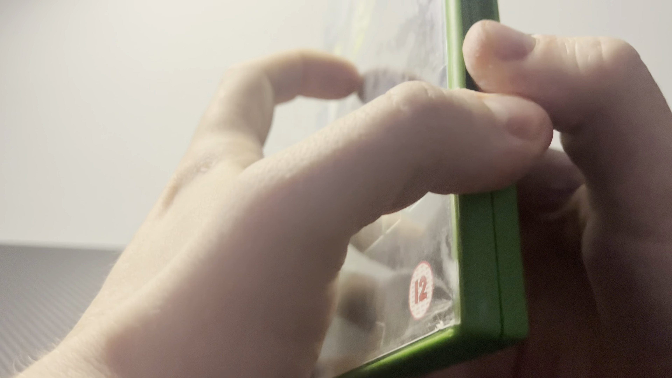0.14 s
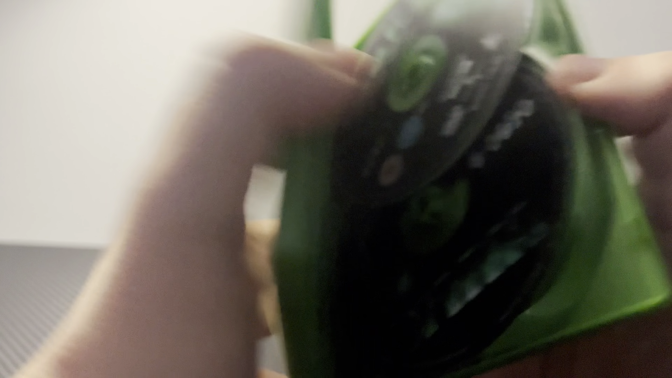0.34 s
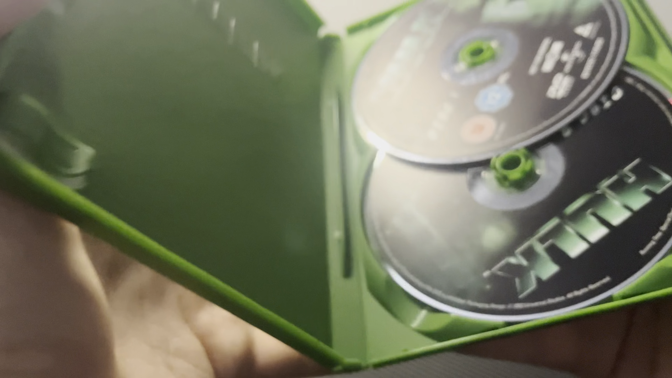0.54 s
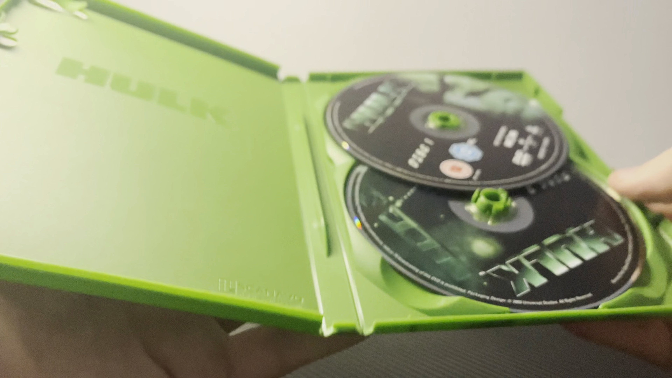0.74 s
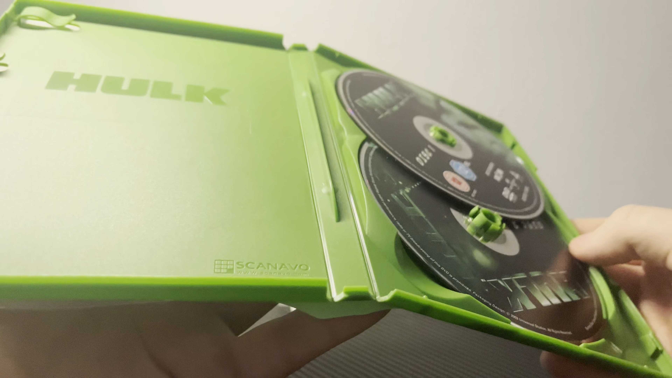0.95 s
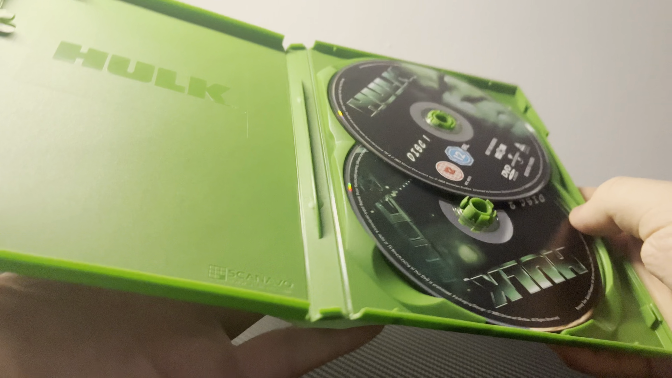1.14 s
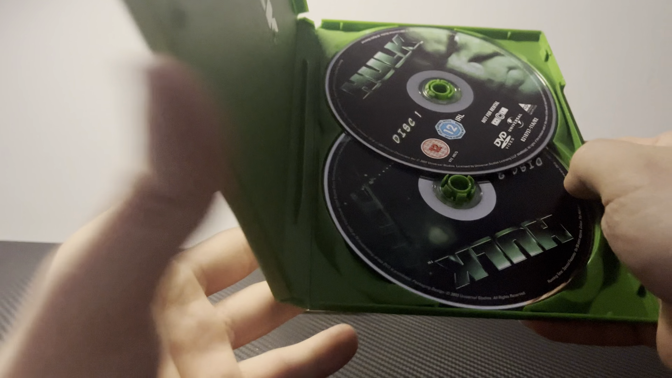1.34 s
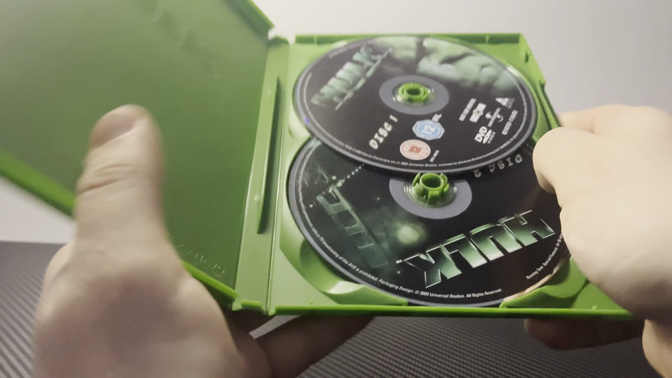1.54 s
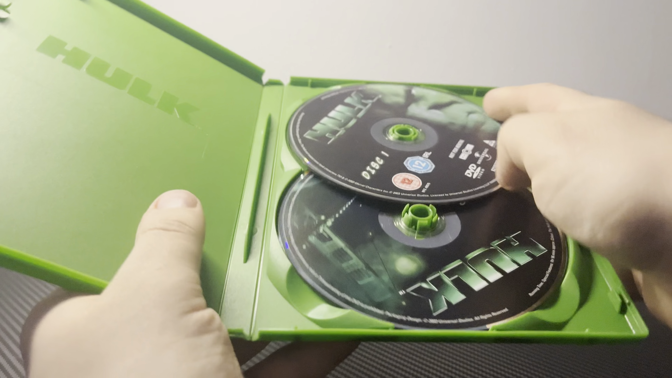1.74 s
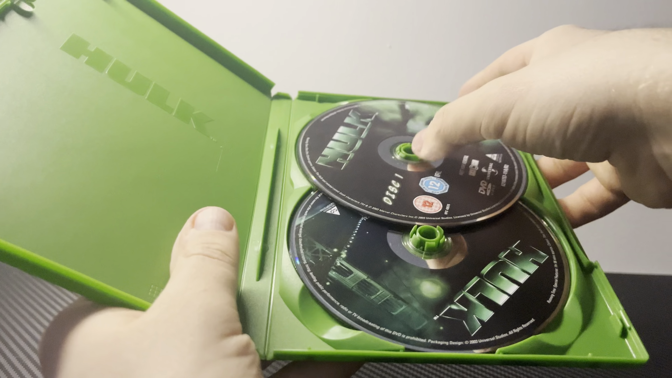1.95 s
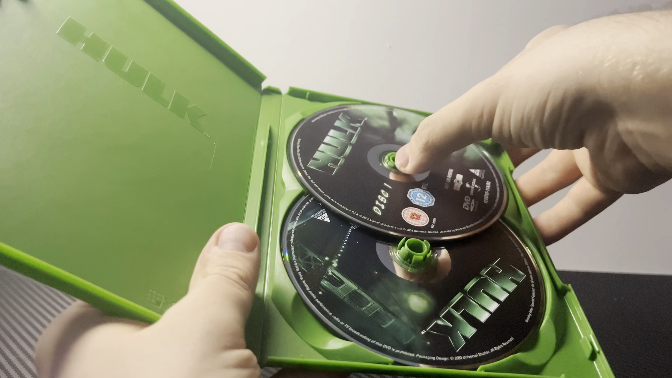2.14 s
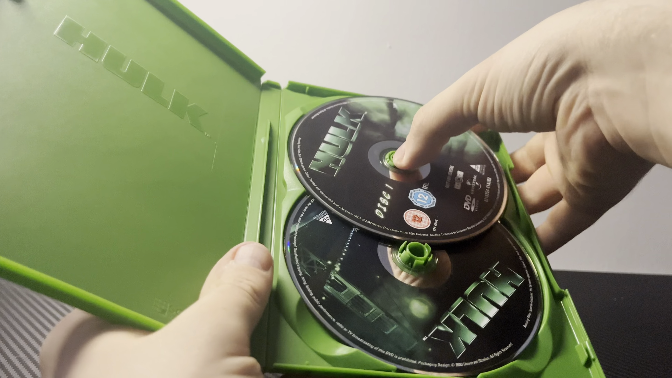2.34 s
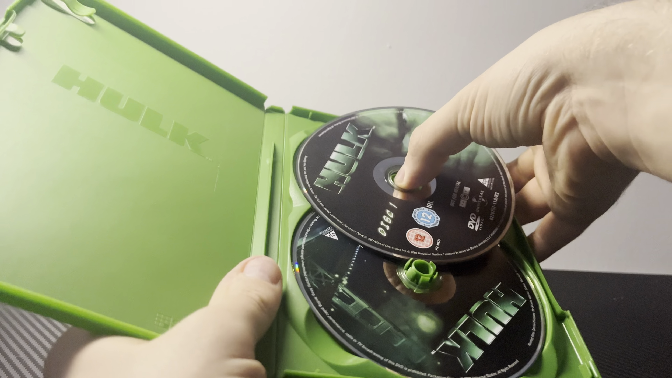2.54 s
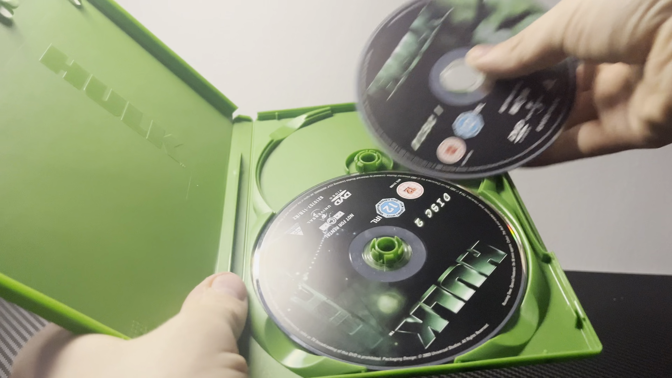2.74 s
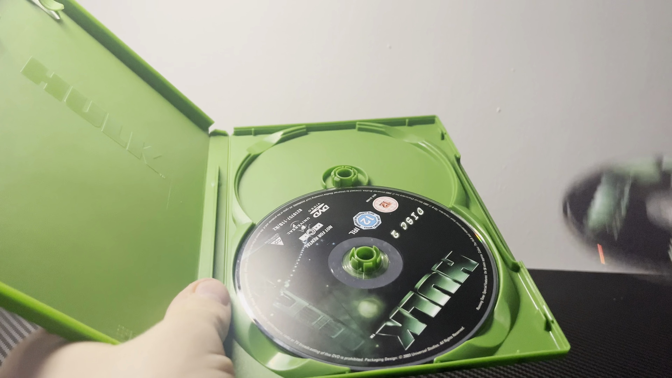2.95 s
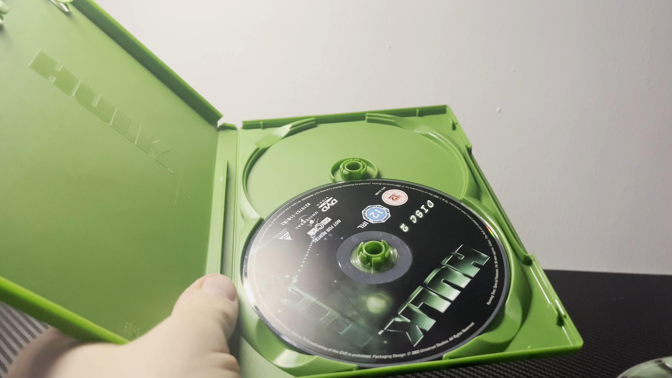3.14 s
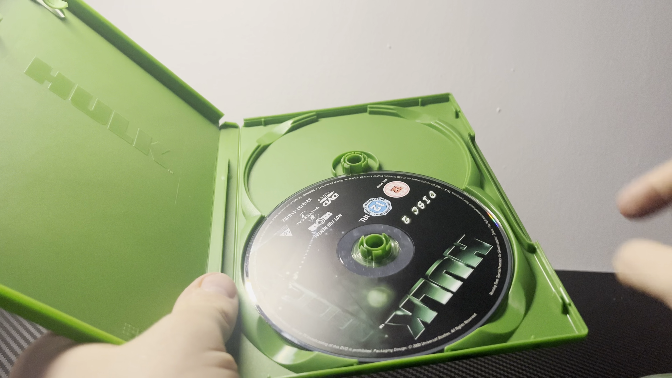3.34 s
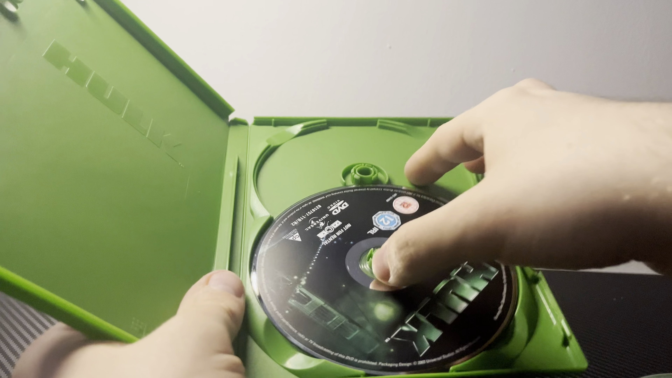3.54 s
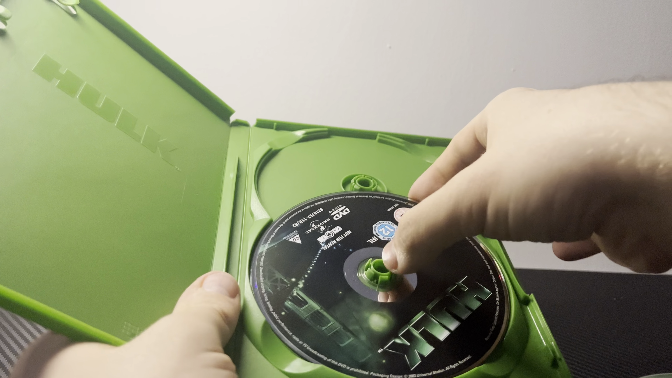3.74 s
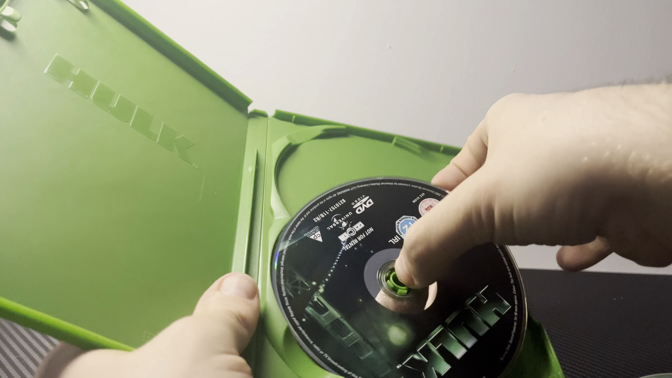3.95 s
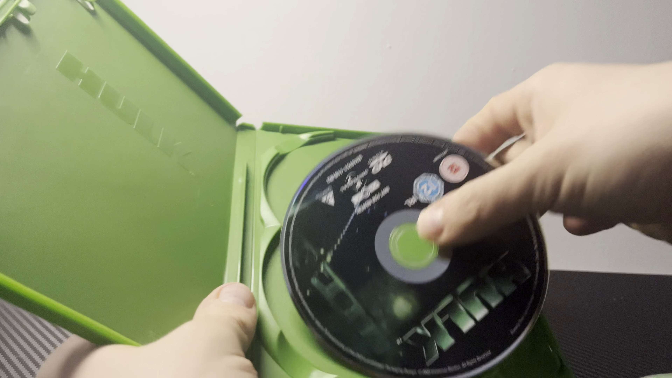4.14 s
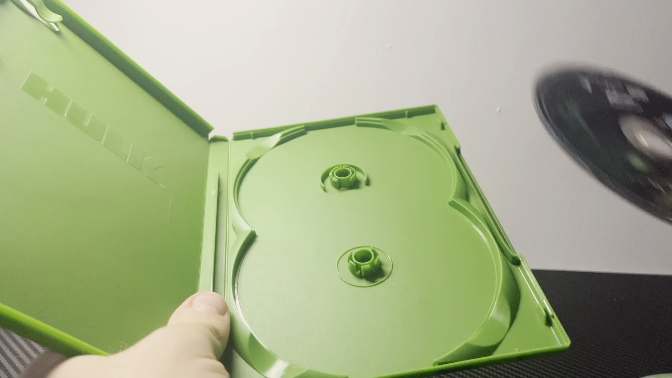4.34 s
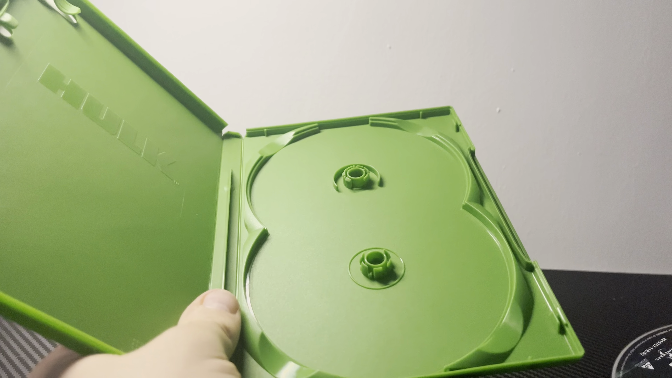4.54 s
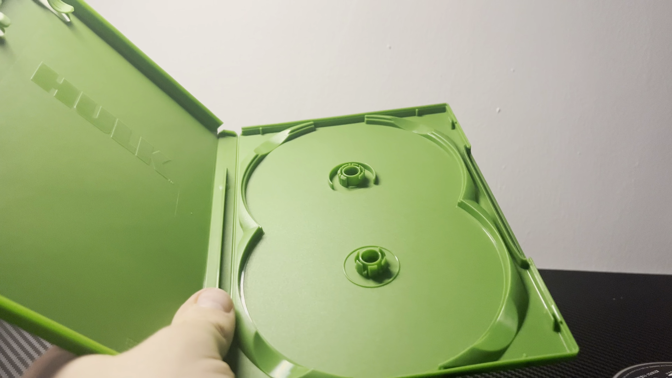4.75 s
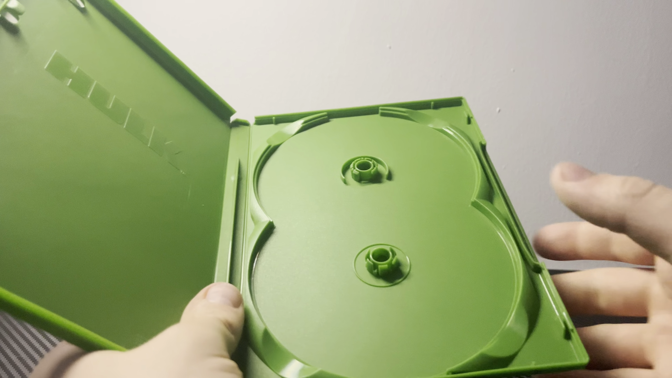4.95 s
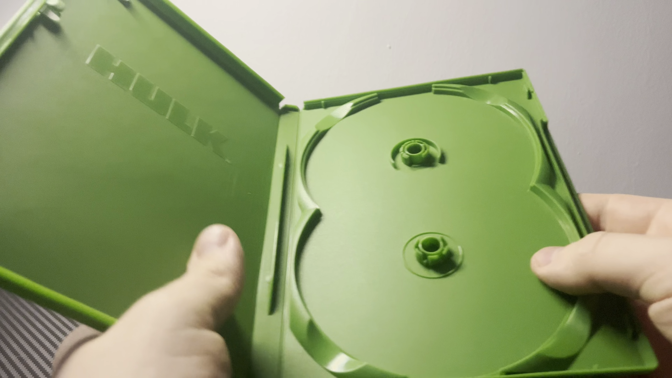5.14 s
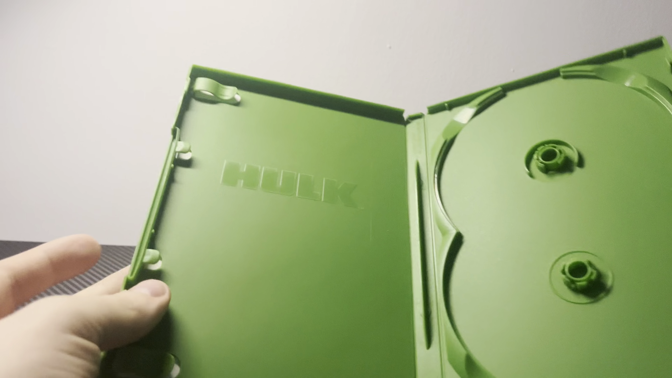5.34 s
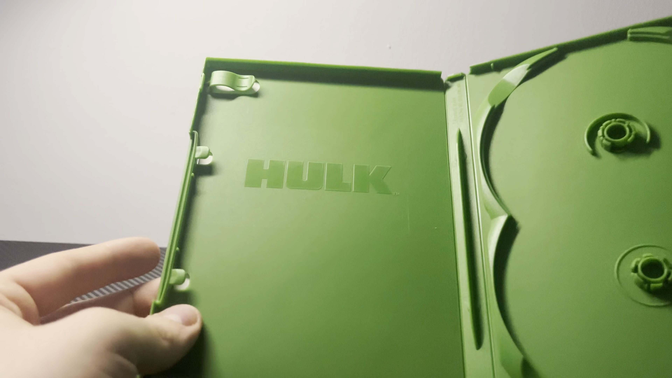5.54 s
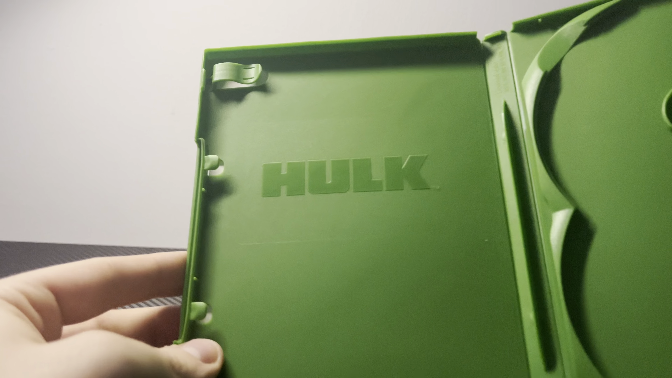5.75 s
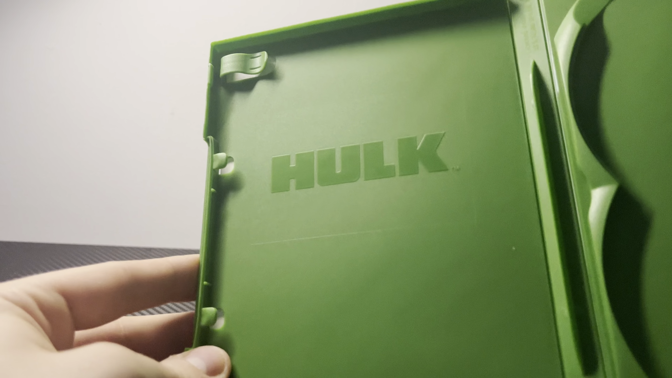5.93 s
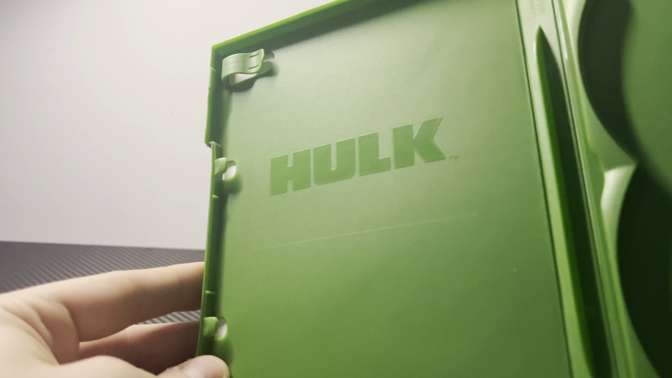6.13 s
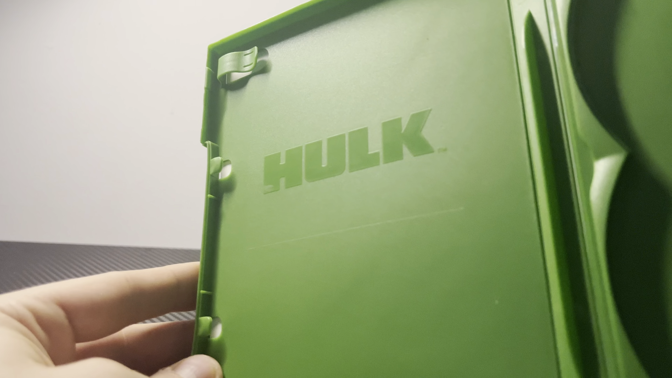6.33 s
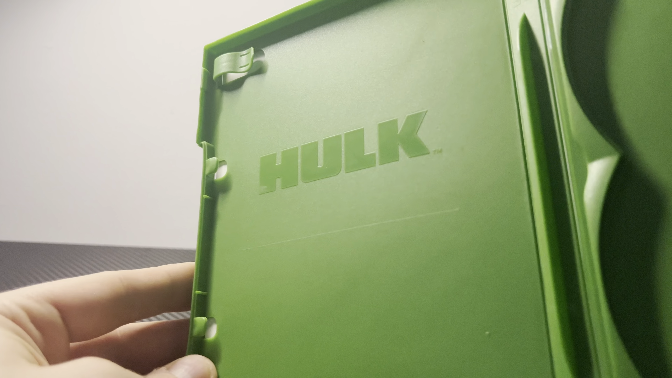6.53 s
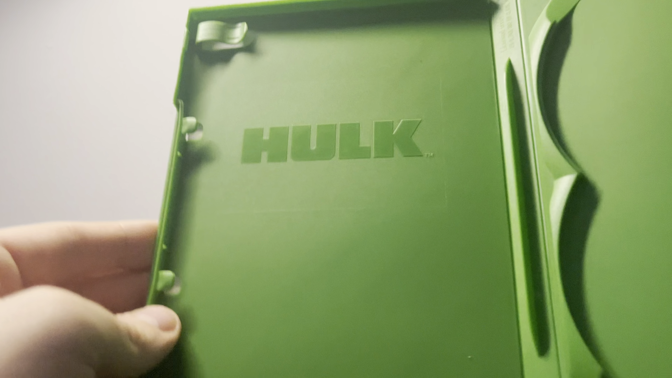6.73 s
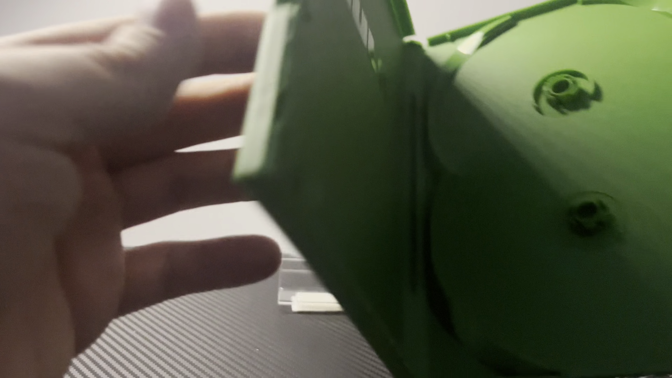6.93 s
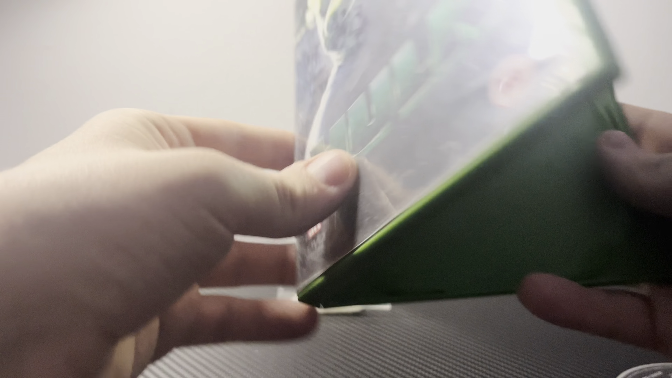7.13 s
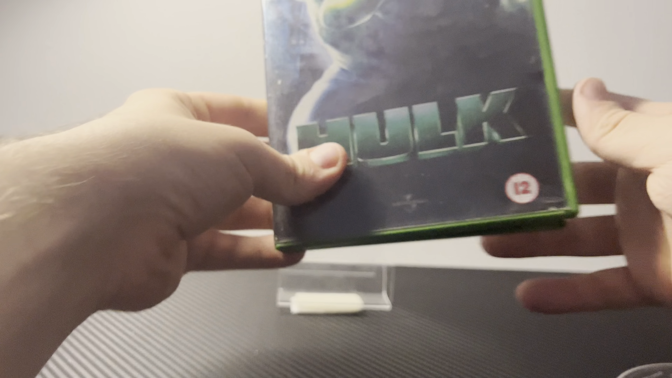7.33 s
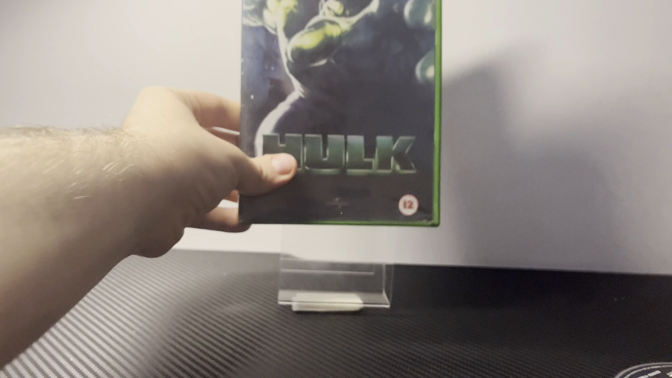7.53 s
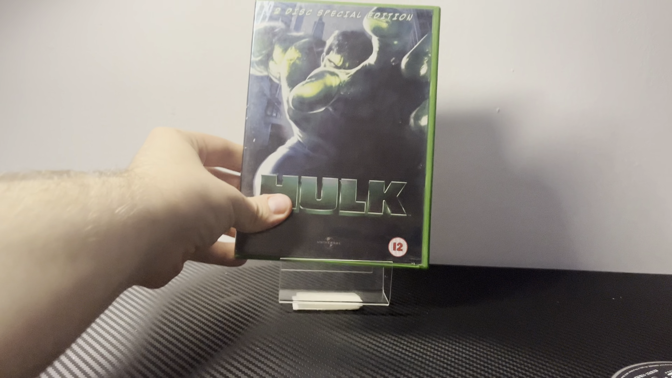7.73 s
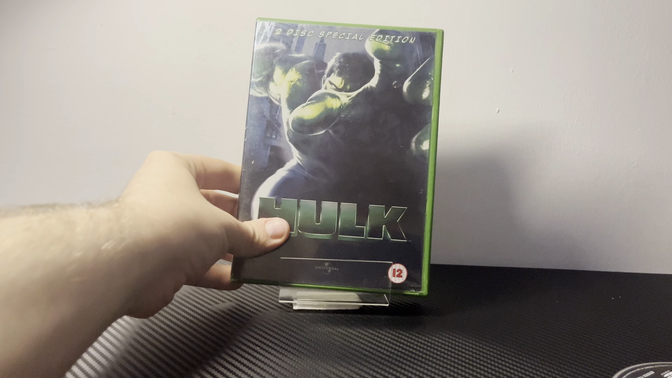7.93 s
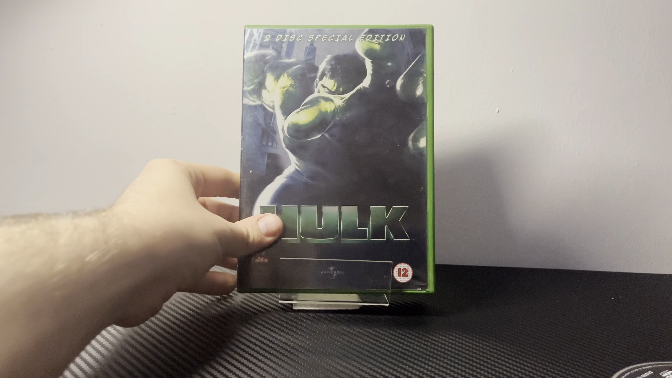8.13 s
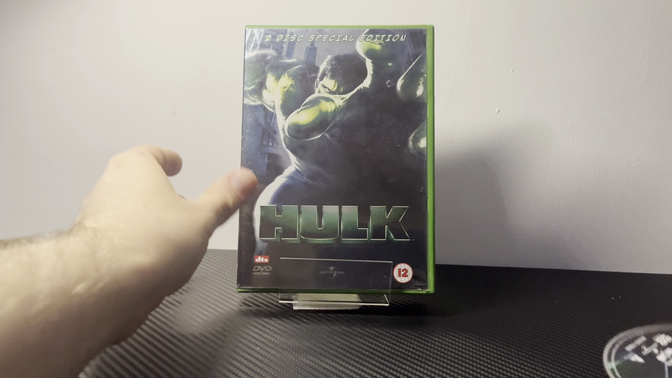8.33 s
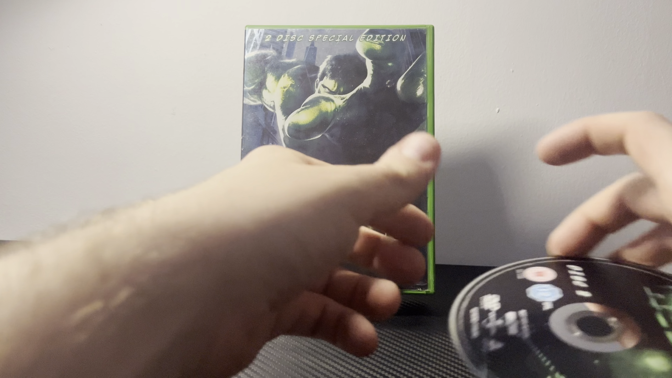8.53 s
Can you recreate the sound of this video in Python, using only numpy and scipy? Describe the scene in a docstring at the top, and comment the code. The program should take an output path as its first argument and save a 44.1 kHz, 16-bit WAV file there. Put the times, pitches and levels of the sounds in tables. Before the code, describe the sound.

A close, dry phone pickup in a small quiet room, with faint air, low hum and wavering hand rumble. Light ticks at 0.2-0.3 seconds lead to a loud hollow plastic double snap with a low thump near 0.35, then a click at 0.42 and loose rattles until about 1.0. Soft scuffs and small dull clicks continue from 1.2 to 2.2. At 2.48 a very sharp crack, followed by another at 2.6, pops the first disc loose; it scrapes brightly to 2.8, with a small tap at 3.1. A second pair of hard pops comes at 3.9-3.95, with a ringing scrape around 4.15. Light table taps fall at 4.5-4.7. Faint rubbing and near-quiet follow through 7.3, including a very soft closing. A dull knock at 7.57 and gentle rocking contacts at 7.9-8.1 set the case on its stand, then quiet.

```python
"""A plastic disc case handled close to a phone in a quiet small room, over a low rumble and hum: it is
snapped open, two discs are popped off their hubs and laid on a table, the case is turned, shut and
stood on a small acrylic stand. Soft thumps are short damped swings of hands, lid and table; blows are
chattering noise bursts through plastic resonances; a fading rustle of loose parts shivers after those
on the case; fingers and sleeve scuff in strokes of noisy slips through the same resonances."""
import sys
import numpy as np
from scipy import signal
from scipy.fft import rfft, irfft, next_fast_len
from scipy.io import wavfile
from scipy.ndimage import uniform_filter1d

SR = 44100
rng = np.random.default_rng(int(sys.argv[2]) if len(sys.argv) > 2 else 0)


def level_to_linear(level):
    """Convert decibel levels to linear amplitude factors, elementwise."""
    exponent = np.asarray(level, float) / 20
    return 10 ** exponent


def output_pcm(signal):
    """Save a mono or channel-first signal as 16-bit PCM at the path in sys.argv[1].

    Samples are clipped to [-1, 1] before scaling.
    """
    pcm = np.clip(np.atleast_2d(signal).T, -1, 1) * 32767
    wavfile.write(sys.argv[1], SR, np.round(pcm).astype(np.int16))


N = 378378

# blows: t/s, crack level/dB, shell level/dB, top octave lift/dB
BLOWS = [(0.1678, -24.5, -42, 10), (0.2623, -40, -51, 5.5), (0.3001, -34, -55, 4), (0.3366, -12, -9.5, 2.5),
         (0.3453, -9.5, -8.5, -6.5), (0.4211, -17, -29, -4), (0.5217, -28.5, -49.5, 3.5),
         (0.5439, -28, -43.5, -2), (0.6002, -26, -56.5, 0.5), (0.659, -25, -54, 4.5),
         (0.6914, -19, -56.5, -1), (0.7675, -27.5, -79, 4), (0.9609, -27, -55.5, -0.5),
         (0.987, -29.5, -46.5, 4.5), (1.1911, -32.5, -45, -22), (1.2507, -38, -42, -8.5),
         (1.4696, -39.5, -48, -7), (1.5061, -36, -43, -13.5), (1.5806, -38, -51, -10),
         (1.6662, -33, -43.5, -7), (1.764, -32.5, -36, -7.5), (1.8902, -38.5, -39, 1.5),
         (1.9997, -31, -40, 1.5), (1.9114, -23, -34.5, -13.5), (2.0265, -23, -33, -5),
         (2.0764, -28.5, -39.5, -11), (2.1679, -34, -45.5, -7), (2.423, -34.5, -54, 11.5),
         (2.4777, 0, -19.5, -4.5), (2.596, -6.5, -16, -1), (2.761, -23, -33.5, -3.5),
         (2.77, -21.5, -36, -5.5), (3.0894, -28, -37.5, -2.5), (3.8919, -46, -32.5, -6.5),
         (3.912, -10, -28, -4.5), (3.9526, -5.5, -16, 1), (4.118, -32.5, -30, -14),
         (4.1378, -22.5, -36, -5.5), (4.5317, -27.5, -38.5, 5), (4.6531, -40, -42, 8.5),
         (4.688, -31.5, -39.5, 11.5), (5.0245, -52, -63, 6), (5.0894, -39, -47.5, 4),
         (5.344, -40.5, -41.5, 7.5), (6.8369, -31, -77, 1), (7.0328, -63, -46.5, 18),
         (7.2867, -37.5, -49.5, 2), (7.5736, -19.5, -26.5, -11.5), (7.867, -32.5, -36, -9),
         (7.993, -44, -27.5, 0), (8.096, -68, -30.5, -4.5), (8.2085, -53.5, -65.5, 8),
         (8.543, -48.5, -52.5, -16.5)]
# resonances of the case: f/Hz, width/Hz, level/dB
CASE = [(265, 240, 0.5), (694, 110, -1), (948, 160, -6.5), (1450, 150, -2.5), (2270, 54, 4),
        (3420, 390, -4.5), (4050, 780, -3.5), (5200, 900, -7)]
# resonances of the stand: f/Hz, width/Hz, level/dB
STAND = [(278, 98, -7), (806, 250, -6.5), (1010, 51, 0), (1638.6, 89, -4.5), (2700, 110, -9),
         (4660, 300, -7.5)]
# broad spectrum of cracking and scuffed plastic: f/Hz, relative level per Hz/dB
PLASTIC = [(600, -26), (1200, -12.5), (2400, -4.5), (6000, -8), (7900, -18), (11300, -9), (14000, -17.5),
           (16300, -48.5)]
# a freed disc scrapes over rim and hub: start t/s, end t/s
DISC_SLIDES = [(2.66, 2.8), (4.14, 4.3)]
STAND_FROM_S = 7.5
SPLIT_HZ = 1300.0  # dull shell modes below, treble above


def level(x, db=0):
    """Scale to an rms level."""
    return x * level_to_linear(db) / np.sqrt(np.mean(x ** 2))


def on_log(table, hz, axis=1):
    """Read a column of a table on a log-frequency axis."""
    table = np.transpose(table)
    return np.interp(np.log(hz + 1), np.log(table[0]), table[axis])


def shaped(x, response):
    """Filter by a function of frequency."""
    size = next_fast_len(x.shape[-1])
    spectrum = rfft(x, size) * response(np.fft.rfftfreq(size, 1 / SR))
    return irfft(spectrum, size)[..., :x.shape[-1]]


def colour(table):
    """Gain curve of a short spectrum."""
    return lambda hz: level_to_linear(on_log(table, hz))


def ringing(modes, strength=1):
    """Response of damped resonances, each struck with its own signed strength."""
    f, width, db = np.transpose(modes)[:, :, None]
    gain = level_to_linear(db) * np.reshape(strength, (-1, 1))
    return lambda hz: np.sum(gain * 1j * hz * width / (f ** 2 - hz ** 2 + 1j * hz * width), axis=0)


def treble(x):
    """The part above the shell's dull modes."""
    return shaped(x, lambda hz: 1 / (1 + (SPLIT_HZ / (hz + 1)) ** 4))


def walk(rate_hz):
    """Random levels held 1 / rate_hz and slewed; spread near 1."""
    k = int(SR / rate_hz)
    held = np.repeat(rng.standard_normal(N // k + 1), k)
    return 1.3 * uniform_filter1d(uniform_filter1d(held, k), k)[:N]


def place(out, s, x):
    """Add x to out from time s."""
    i = int(s * SR)
    return np.pad(x, ((0, 0), (i, max(N - i - x.shape[1], 0))))[:, :N] + out


def background():
    """Still air, alike at both ports in the bass, a wavering hum and the rumble of moving hands."""
    # colour of air and rumble: f/Hz, relative level per Hz/dB
    quiet = [(30, -16), (55, -4.5), (110, -8.5), (300, -27), (700, -41.5), (5000, -43), (8000, -51.5),
             (15500, -56.5)]
    # hum: f/Hz, width/Hz, level/dB
    hums = [(102, 2.3, -70)]
    # handling rumble before its random waver: t/s, level/dB
    rumble_levels = [(0, -64.5), (1.001, -67.5), (2.001, -51), (2.299, -68), (5.501, -61.5), (6.302, -83.5),
                     (7.2, -68), (8, -55.5), (8.3, -87)]
    mid, side, hands = shaped(rng.standard_normal((3, N)), colour(quiet))
    side = shaped(side, lambda hz: np.minimum(hz / 500.0, 1))
    air = level(mid + side * np.array([[1], [-1]]), -65)
    hum = sum(level(shaped(rng.standard_normal(N), ringing([(f, w, 0)])), db) for f, w, db in hums)
    rumble = level(shaped(hands, lambda hz: 1 / (1 + (hz / 1000.0) ** 4)))
    rumble_db = np.interp(np.arange(N) / SR, *np.transpose(rumble_levels)) + 3.7 * walk(5.8)
    return air + hum + rumble * level_to_linear(rumble_db)


def thumps():
    """A soft contact, push or knock sets hands, lid or table swinging for a few damped cycles."""
    # thumps: t/s, peak level/dB, swing f/Hz
    pushes = [(0.015, -47.5, 580), (0.122, -57, 650), (0.221, -44.5, 680), (0.553, -40, 243),
              (0.579, -39, 235), (4.646, -42, 900), (0.355, -14.5, 120), (0.366, -21, 51.6),
              (2.031, -42, 100), (2.605, -28, 216), (2.771, -41, 109), (3.111, -41, 112.1),
              (3.287, -39, 113.9), (3.967, -20.5, 101), (4.555, -41, 106), (4.708, -26.5, 108),
              (5.116, -36.5, 62.3), (5.367, -38.5, 64), (7.117, -39, 92), (7.606, -37.5, 93),
              (7.915, -40, 100), (8.128, -34, 102.3)]
    out, t = 0, np.arange(SR // 4) / SR
    for s, db, hz in pushes:
        cycles = hz * t
        swing = np.sin(2 * np.pi * cycles) * (1 - np.exp(-cycles / 0.28)) * np.exp(-cycles / 1.1)
        out = place(out, s - 1 / hz, level_to_linear(db) * swing[None] / np.abs(swing).max())
    return out


def room(x):
    """A short diffuse tail, different at each port, each band of noise fading at its own rate."""
    # reverberation: f/Hz, t60/s, level/dB
    decay = [(149.55, 0.17, -14), (701.4, 0.032, 1.5), (4020, 0.098, -8.5), (13000, 0.013, -18.5)]
    t, tail = np.arange(SR // 2) / SR, 0
    for hz in 100 * 2 ** np.arange(0, 7.6, .75):
        noise = rng.standard_normal((2, len(t)))
        band = shaped(noise, lambda f: np.exp(-(np.log((f + 1) / hz) / 2.8) ** 2))
        band = band * level_to_linear(-60 * t / on_log(decay, hz)) * np.minimum(t / 0.046, 1)
        share = np.sqrt(hz / SR / np.sum(band ** 2, axis=1, keepdims=True))  # flat per Hz
        tail = tail + band * share * level_to_linear(on_log(decay, hz, axis=2))
    return signal.fftconvolve(x.mean(axis=0, keepdims=True), tail, axes=1)[:, :N]


def disc_on_case():
    """A freed disc's modes over the dull modes of the case."""
    # resonances of a disc: f/Hz, width/Hz, level/dB
    disc = [(1750, 120, -10), (2685, 97, -2), (3200, 84, -4), (3990, 86, -3)]
    return [mode for mode in CASE if mode[0] < SPLIT_HZ] + disc


def struck(s):
    """Modes of what is hit at time s: the case, a freed disc on the case, or the stand."""
    if any(start < s < end for start, end in DISC_SLIDES):
        return disc_on_case()
    return CASE if s < STAND_FROM_S else STAND


def blows():
    """Each contact chatters for a few ms: a broad crack and the modes of what is struck."""
    out, t = 0, np.arange(SR // 8) / SR
    for s, crack_db, shell_db, lift_db in BLOWS:
        # dull contacts on the stand roll in slowly
        rocking = level_to_linear(1.49 * np.clip(shell_db - crack_db, 0, 14)) if s > STAND_FROM_S else 1
        attack = np.minimum(t / (0.00037 * rocking), 1) ** 2
        noise, flurry = rng.standard_normal((2, len(t)))
        chatter = noise * level_to_linear(1.9 * flurry) * np.exp(-t / 0.0047) * attack
        modes = np.array(struck(s), float)
        modes[:, 0] *= 1 + .02 * rng.standard_normal(len(modes))  # the grip bends the pitches a little
        # a new spot, a new mix of modes
        sign, spread = rng.standard_normal((2, len(modes)))
        ring = shaped(chatter, ringing(modes, np.sign(sign) * level_to_linear(2.5 * spread)))
        crack = level(shaped(chatter, colour(PLASTIC))) + level(treble(ring), -6.0)
        crack = crack / np.abs(crack).max()
        crack = shaped(crack, colour([(6500, 0.0017), (8500, lift_db)]))  # harder edges reach higher
        shell = ring - treble(ring)
        shell = shell / np.abs(shell).max()
        out = place(out, s, level_to_linear(crack_db) * crack[None] + level_to_linear(shell_db) * shell)
    return out


def shivers():
    """Loose shell and discs shiver after each blow on the case: rows as in drags()."""
    rows = []
    fade_db, flex_db = 32.88, -7.5
    for s, crack_db, shell_db, _ in BLOWS:
        first_db = crack_db + 0.28 * (shell_db - crack_db) - 22.5
        if s < STAND_FROM_S:
            rows.append((s + 0.013, s + 0.16, first_db, first_db - fade_db, flex_db))
    return rows


def drags():
    """Drags of skin and sleeve over the plastic."""
    # drags: start t/s, end t/s, first level/dB, last level/dB, dull flexing against the scuff/dB
    return [(0.358, 0.43, -28, -33, -1), (0.43, 0.63, -44.5, -58.5, 2.5), (0.635, 0.84, -48, -66, -37),
            (1.07, 1.27, -62, -59.5, -4.5), (1.426, 2.2, -56, -60.5, 2), (2.389, 2.47, -67.5, -48, -31.5),
            (2.67, 2.74, -53.5, -45, -20), (2.765, 2.92, -48.5, -80, 3.5), (3.09, 3.3, -63, -61, -4.5),
            (3.54, 3.66, -62.5, -64.5, -2.5), (3.704, 3.86, -69, -77, 15.5),
            (4.15, 4.19, -42, -40.5, -13.5), (4.192, 4.26, -34.5, -61.5, -31), (4.355, 4.46, -78, -72, -20),
            (4.65, 4.74, -52.5, -69, 7), (5.147, 5.35, -53.5, -60, -15), (5.624, 6.1, -61.5, -80.5, -0.5),
            (6.72, 6.95, -74, -70, -15), (7.029, 7.15, -62, -65, -4), (7.245, 7.35, -63.5, -62.5, 0),
            (7.37, 7.56, -77.5, -73, -19), (7.6, 7.76, -60.5, -67.5, 5.5), (7.874, 7.95, -54.5, -70, 7.5),
            (8.008, 8.126, -60, -55.5, 3)]


def rubbed(slips, modes):
    """The contact wanders, so each mode swells and fades on its own."""
    return level(sum(shaped(slips, ringing([mode])) * level_to_linear(4.0 * walk(35)) for mode in modes))


def strokes(shiver):
    """Dense tiny slips in flurries scuff the plastic and flex the shell; a shiver has no catches."""
    # ringing of the plastic against the broad rustle, first drags, then shivers: level/dB
    ring_db = [-7.5, 1.5]
    hard_db = 6.5  # disc and stand ring more than the soft case
    let_go_s, let_go_db = .07, -18  # every contact dies away as it lets go
    time = np.arange(N) / SR
    on_case = time < STAND_FROM_S

    slips = rng.standard_normal(N) * level_to_linear(2.2 * walk(50) + (1 - shiver) * 2.8 * walk(25))
    # the sleeve crackles under the fingers: 70 catches/s, each fading over 2 ms
    catches = on_case * (rng.random(N) < 70 / SR) * level_to_linear(9 + 4 * rng.standard_normal(N))
    crackle = signal.lfilter([1], [1, -np.exp(-1 / (.002 * SR))], catches) * rng.standard_normal(N)
    slips = slips + (1 - shiver) * crackle

    ring = np.where(on_case, rubbed(slips, CASE), level_to_linear(hard_db) * rubbed(slips, STAND))
    sliding = sum((time > start) & (time < end) for start, end in DISC_SLIDES)
    ring = np.where(sliding, level_to_linear(hard_db) * rubbed(slips, disc_on_case()), ring)
    scuff = level(shaped(slips, colour(PLASTIC))) + level(treble(ring), ring_db[shiver])
    scuff = level(scuff)
    flex = level(ring - treble(ring))

    bright, dull = np.zeros((2, N))
    for start, end, first_db, last_db, flex_db in shivers() if shiver else drags():
        i, j = int(start * SR), int((end + let_go_s) * SR)
        stops_s = [start, end, end + let_go_s]
        drag = level_to_linear(np.interp(time[i:j], stops_s, [first_db, last_db, last_db + let_go_db]))
        bright[i:j] = np.hypot(bright[i:j], drag)
        dull[i:j] = np.hypot(dull[i:j], drag * level_to_linear(flex_db))
    ease = SR // (400 if shiver else 70)
    return scuff * uniform_filter1d(bright, ease) + flex * uniform_filter1d(dull, ease)


def scene():
    """Direct sound reaches two ports with a phase offset, a little louder left; the room follows."""
    # left lead: f/Hz, phase/rad
    ports = [(100, .08), (700, .7), (3100, 1.5), (12000, 1.4)]
    # left minus right: f/Hz, level/dB
    left_db = [(100, 1.5), (4500, 6), (9000, 1)]
    near = thumps() + blows() + strokes(True) + strokes(False)
    side = np.array([[.5], [-.5]])
    direct = shaped(near, lambda hz: np.exp(1j * side * on_log(ports, hz)) * level_to_linear(side * on_log(left_db, hz)))
    return background() + direct + room(near)


def band_limit(x):
    """A steep low-pass at the top of the band."""
    return signal.sosfilt(signal.butter(12, 16500, fs=SR, output="sos"), x)


def record(dry):
    """The phone cuts the deepest bass and rounds the highest peaks."""
    dry = signal.sosfilt(signal.butter(4, 42., "high", fs=SR, output="sos"), dry)
    mix = np.tanh(0.88 * dry) / 0.74
    return band_limit(mix)


dry = scene()
out = record(dry)
output_pcm(out)
```